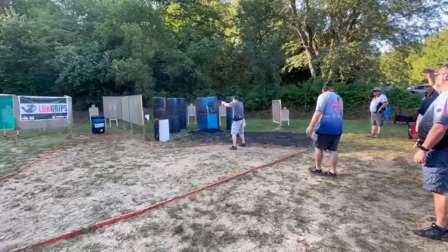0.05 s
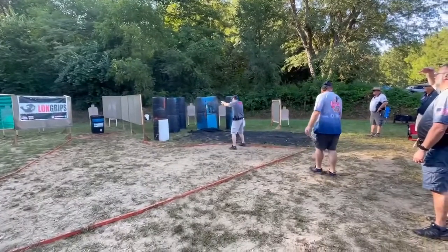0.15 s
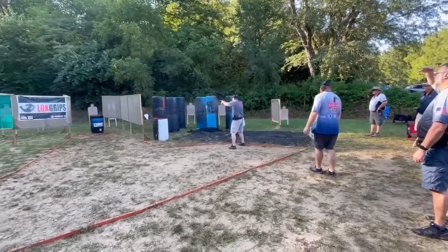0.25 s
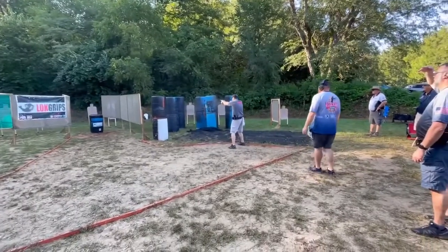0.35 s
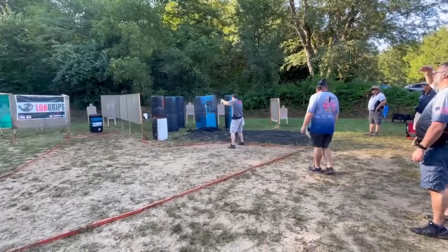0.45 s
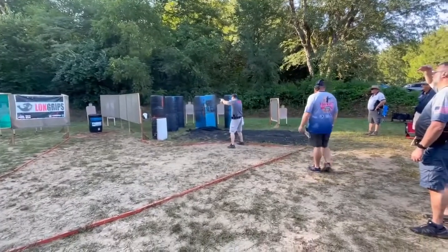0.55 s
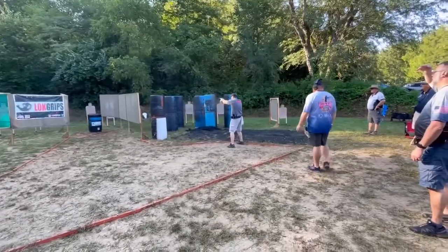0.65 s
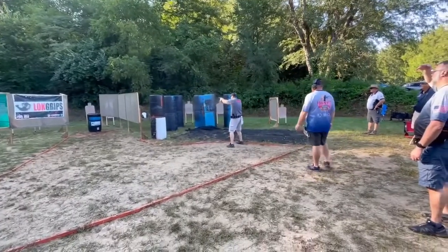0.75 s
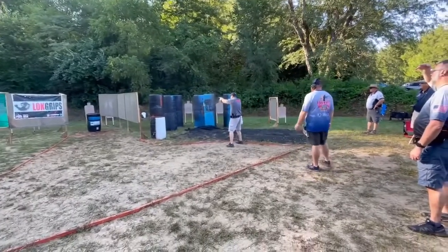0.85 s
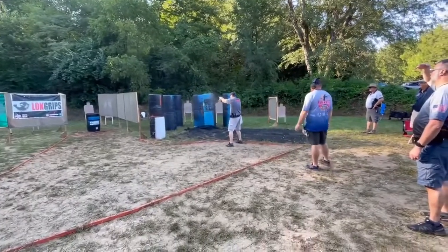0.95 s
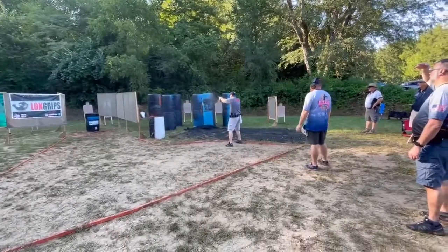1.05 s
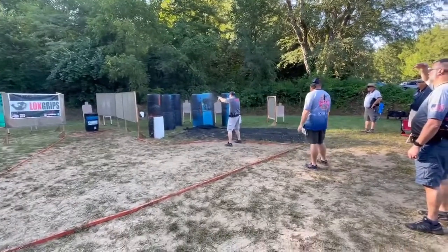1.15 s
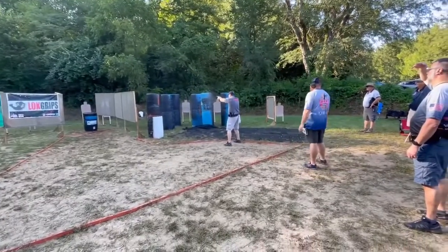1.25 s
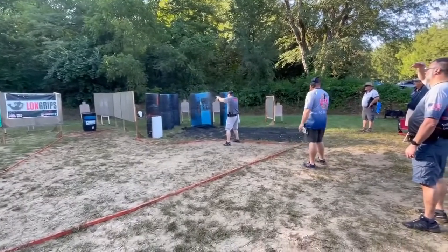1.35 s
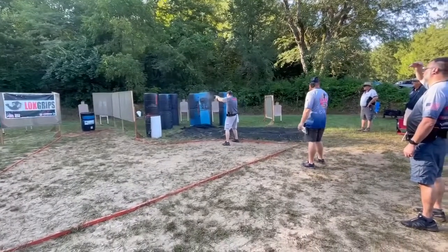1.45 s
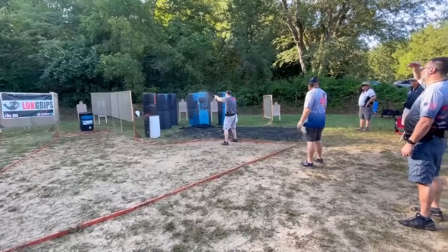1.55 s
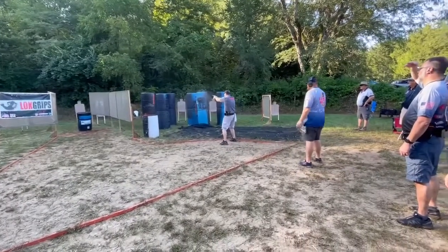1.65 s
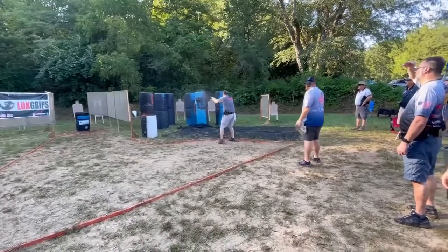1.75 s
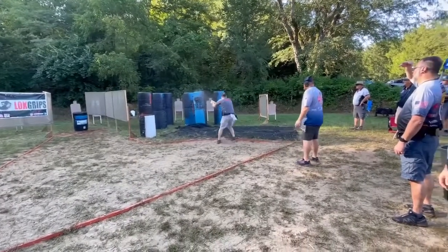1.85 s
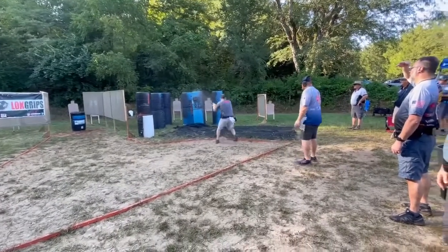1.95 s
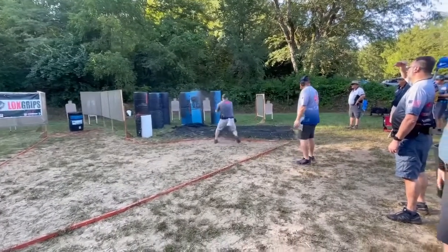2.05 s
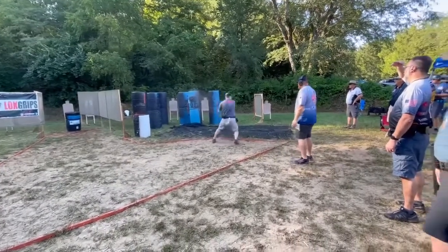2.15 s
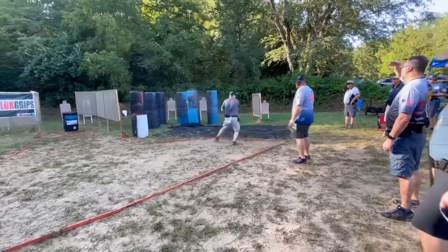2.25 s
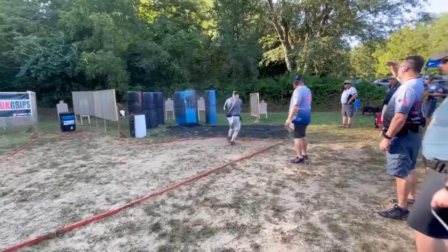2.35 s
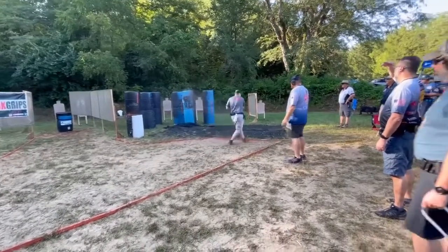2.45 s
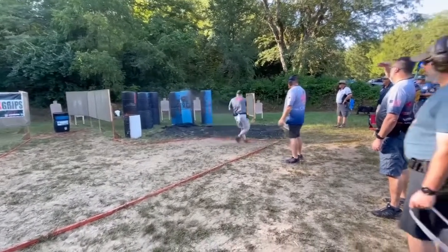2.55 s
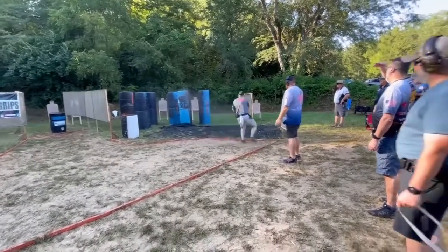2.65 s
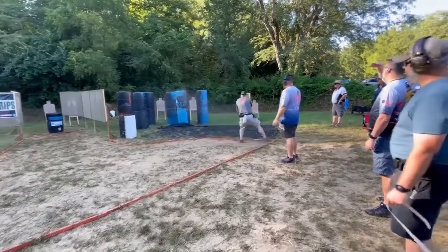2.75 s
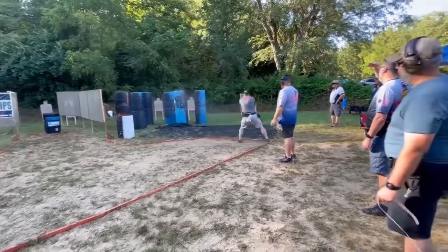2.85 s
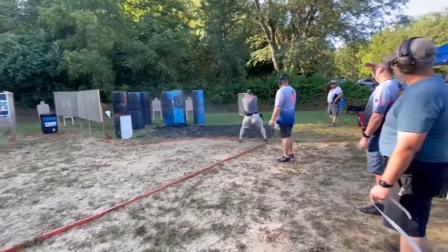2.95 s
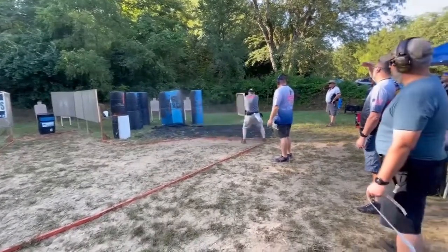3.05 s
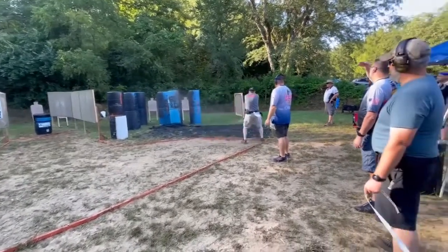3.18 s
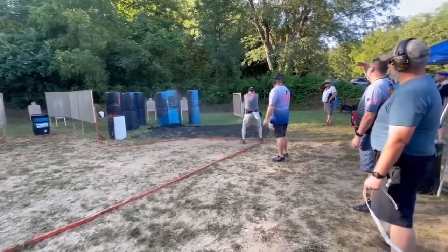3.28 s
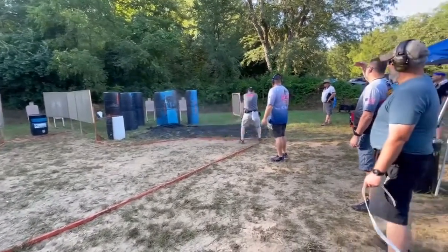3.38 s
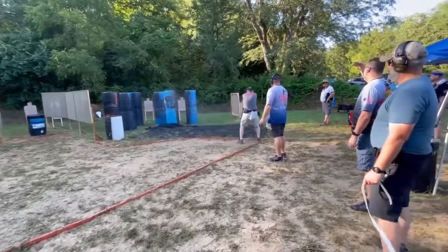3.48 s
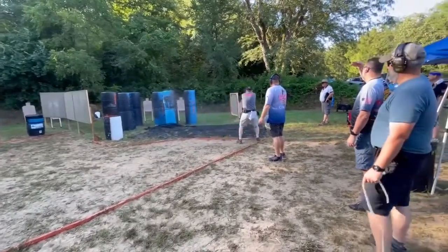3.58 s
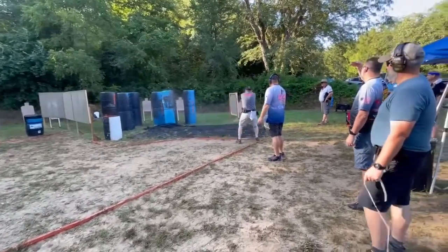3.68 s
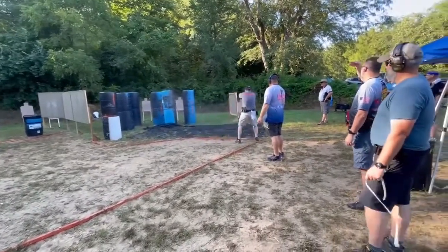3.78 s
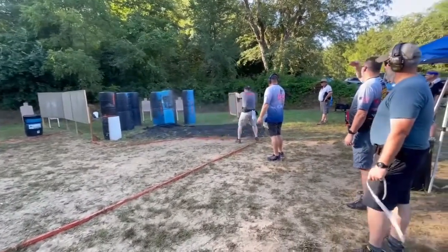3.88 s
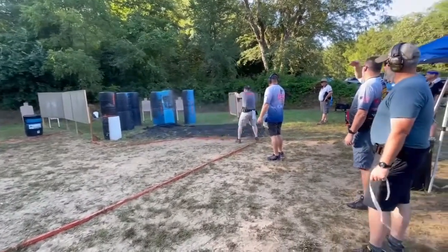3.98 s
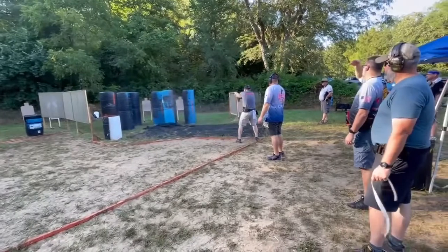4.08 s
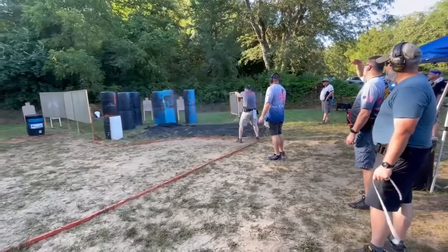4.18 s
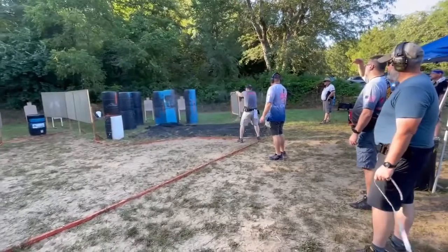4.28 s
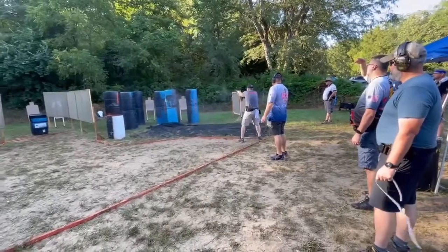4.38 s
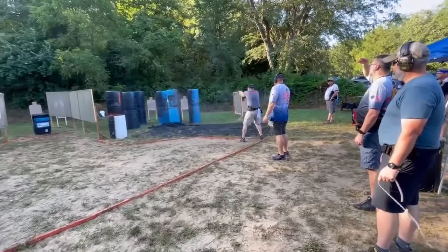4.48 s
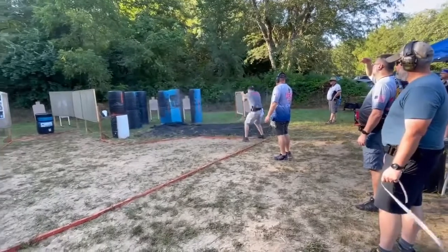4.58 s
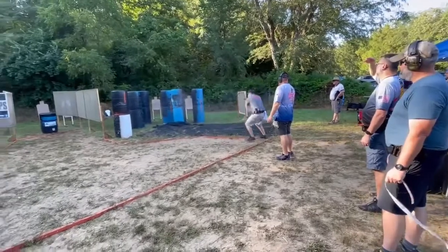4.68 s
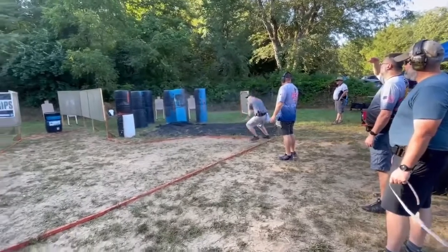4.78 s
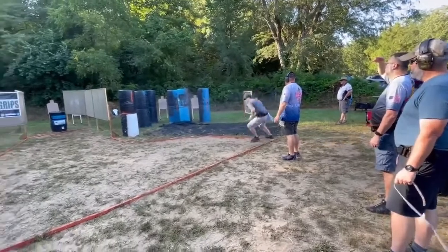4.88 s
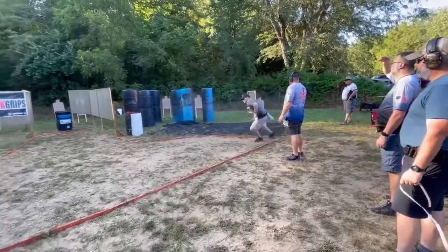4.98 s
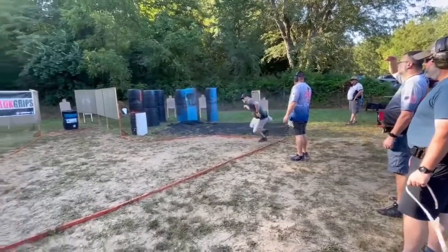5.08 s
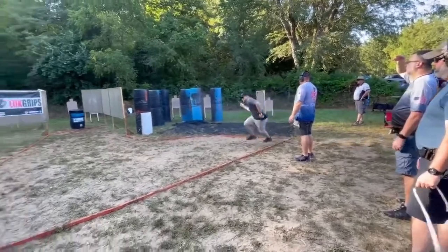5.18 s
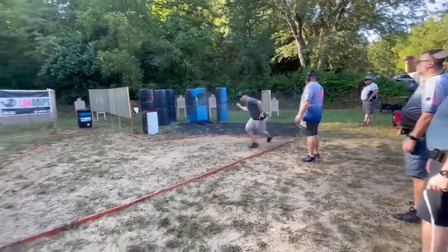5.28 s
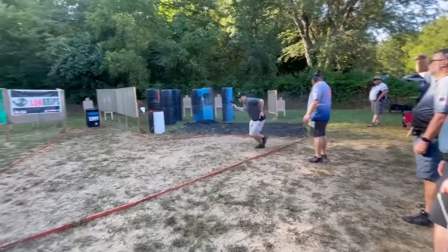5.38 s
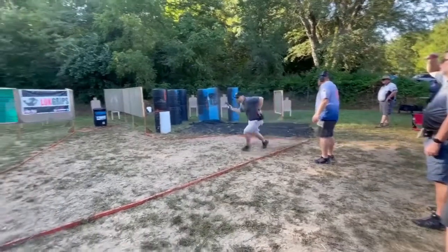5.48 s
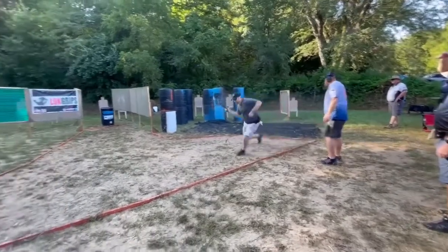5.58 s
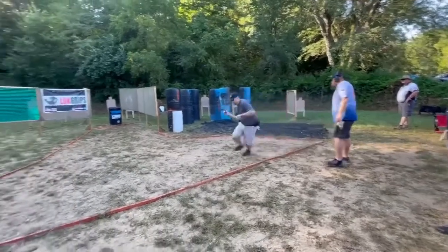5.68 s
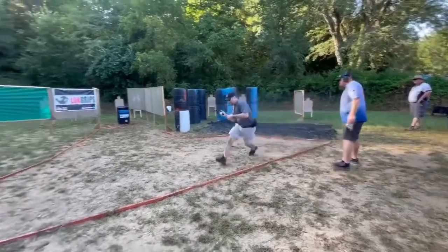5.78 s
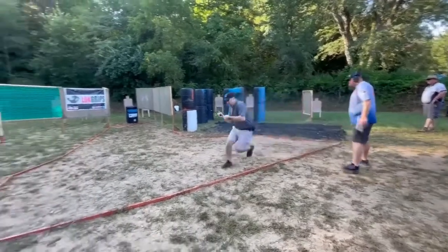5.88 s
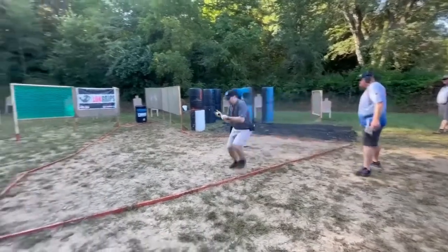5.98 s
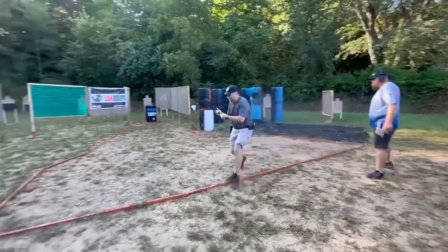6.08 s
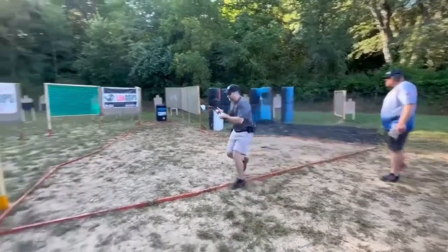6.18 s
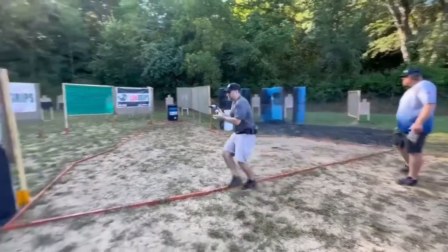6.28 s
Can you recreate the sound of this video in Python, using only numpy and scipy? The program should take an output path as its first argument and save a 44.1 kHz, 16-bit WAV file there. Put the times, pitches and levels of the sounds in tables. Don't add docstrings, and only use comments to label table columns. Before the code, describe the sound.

Sharp, slightly rounded pistol blasts in an open field ringed by trees, heard from a spectator's position. Three spaced shots come first, then after nearly two seconds two quick doubles. Bunched reflections and low barrel booms follow each, trailing into a diffuse leafy echo. Softer muffled shots from other bays fill the gaps and the shooter-free ending, over low air noise, a barely audible cricket and tiny belt clicks.

```python
import sys
import numpy as np
from scipy import signal
from scipy.fft import rfft, irfft, next_fast_len
from scipy.io import wavfile
from scipy.ndimage import uniform_filter1d

SR = 44100
rng = np.random.default_rng(int(sys.argv[2]) if len(sys.argv) > 2 else 0)


def gain_from_db(level_db):
    decades = np.asarray(level_db, float) / 20
    return 10 ** decades


def generate_wav(sig):
    pcm = np.round(np.clip(np.atleast_2d(sig).T, -1, 1) * 32767).astype(np.int16)
    wavfile.write(sys.argv[1], SR, pcm)


N = 279153
TOP_HZ = 11850


def read(points, hz):
    f, value = np.transpose(points)
    return np.interp(np.log(hz + 1), np.log(f + 1), value)


def evened(x):
    return x / np.sqrt(np.mean(x ** 2) + 1e-20)


def add(mix, s, sound):
    part = mix[:, max(round(s * SR), 0):][:, :sound.shape[1]]
    part += sound[:, :part.shape[1]]


def sides(db):
    return gain_from_db(np.array([[db / 2], [-db / 2]]))


# [f/Hz, side minus mid/dB]
WIDTH = [(60, -1.5), (98, -2.5), (160, -18.5), (260, -3.5), (420, -10.5), (680, 1), (1110, 1.5), (1800, 1),
         (2930, 0.5), (4760, 0), (7740, -0.5), (12600, 3)]


def pair(z, hz):
    side = gain_from_db(read(WIDTH, hz))
    return np.array([z[0] + side * z[1], z[0] - side * z[1]]) / np.sqrt(1 + side ** 2)


def coloured(spectrum, size, top_hz=TOP_HZ):
    hz = np.fft.rfftfreq(size, 1 / SR)
    z = rfft(rng.standard_normal((2, size))) * gain_from_db(read(spectrum, hz)) * (hz < top_hz)
    return evened(irfft(pair(z, hz), size))


# [f/Hz, level/dB per Hz]
RUMBLE = [(15, -24), (30, -4), (60, 1), (120, -7.5), (220, -10.5), (400, -46.5)]


def breeze(level_db=-83, lumps_db=6):
    lumps = uniform_filter1d(rng.standard_normal(N), size=3000)
    lumps = evened(uniform_filter1d(lumps, size=3000))
    return gain_from_db(level_db + lumps_db * lumps) * coloured(RUMBLE, size=next_fast_len(N))[:, :N]


def cricket(level_db=-85, whistle_hz=6560, pulses_per_s=19.95, beat_s=2.866, sag_hz=90, duty=0.15):
    beat = 2 * np.pi * pulses_per_s * (np.arange(N) / SR - beat_s)
    tone = np.sin(2 * np.pi * np.cumsum(whistle_hz - sag_hz * np.sin(beat)) / SR)
    return gain_from_db(level_db) * np.sqrt(2) * tone * np.clip(np.cos(beat) + duty, 0, 1) * np.ones((2, 1))


def pulse(chirps, size=900):
    t, ring = np.arange(size) / SR, 0
    for start_hz, end_hz, fall_s, swell_s, db in chirps:
        turns = end_hz * t + (start_hz - end_hz) * fall_s * (1 - np.exp(-t / fall_s))
        swell = (t / swell_s) ** 2 * np.exp(-t / swell_s)
        ring = ring + gain_from_db(db) * swell * np.sin(2 * np.pi * turns)
    return ring / abs(ring).max()


# [start f/Hz, end f/Hz, fall/s, swell/s, level/dB]
BLAST = [(1913, 500, .0011, .001, -2), (3000, 1050, .0008, 0.00034, -0.5)]
# [f/Hz, level/dB per Hz]
CRACK = [(900, -21.5), (1800, 0.5), (3000, 6), (5000, -2.5), (8000, -1.15), (10500, -1), (12500, -12),
         (13200, -43.5)]


def arrival(crack_db, top_hz, spread_s=.0022, lag_s=0.00023, crack_s=0.00095, shared=0.52):
    paths = np.zeros((2, 400))
    at = (rng.random((2, 3)) ** 1.7 * spread_s + lag_s) * SR
    np.put_along_axis(paths, at.astype(int), rng.choice([-1., 1.], (2, 3)) * 0.7, axis=1)
    paths[1] += shared * paths[0]
    blast = signal.fftconvolve(paths, pulse(BLAST)[None], axes=1)[:, :1200]
    u = np.arange(1200) / SR / crack_s
    return blast + gain_from_db(crack_db) * coloured(CRACK, size=1200, top_hz=top_hz) * u * np.exp(1 - u)


# [t/s, tree tail level/dB, thump level/dB, left-right/dB, boom level/dB]
FAR = [(-.12, -28.5, -41, 0, -70), (.07, -31.5, -45, 5, -54), (0.326, -32, -46, -15, -61),
       (0.402, -33.5, -48, 9, -28), (0.647, -30, -28, 2.5, -32), (2.314, -35.5, -34, -12, -47),
       (3.205, -35.5, -28, -5, -57), (3.8004, -31.5, -25, -4, -33.5), (4.9456, -36.5, -31.5, -10, -63.5),
       (5.0704, -33.5, -37, 13, -47), (5.61, -38.5, -26, 7, -45.5), (6.018, -38.5, -45, 6, -36),
       (6.164, -40.5, -49, 10, -57)]
BAY_OF = [2, 2, 2, 1, 1, 0, 0, 1, 0, 1, 3, 3, 1]
# [start f/Hz, end f/Hz, fall/s, swell/s, level/dB]
THUMP = [(1274, 86, 0.0031, 0.00063, -.1)]
OPEN_DB = [-38, -2.5, -32, -12]


def far_shots(lag_s=0.00038, crack_db=-9):
    out = np.zeros((2, N))
    for (s, _, db, pan_db, _), bay in zip(FAR, BAY_OF):
        thump = pulse(THUMP)
        late = np.roll(thump, round(lag_s * SR))
        ports = np.array([thump, late] if pan_db > 0 else [late, thump])
        add(out, s, gain_from_db(db) * sides(pan_db) * ports)
        add(out, s, gain_from_db(db + OPEN_DB[bay]) * sides(pan_db) * arrival(crack_db, TOP_HZ))
    return out


def power(spectrum, hz):
    share = gain_from_db(read(spectrum, hz)) ** 2
    return (share / share.sum())[:, None]


# [f/Hz, level/dB per Hz]
AIR = [(25, -25.5), (55, -3.5), (180, -17), (600, -3.5), (1800, -12), (2600, -30), (6000, -35),
       (9000, -36.5), (11000, -72)]
# [f/Hz, level/dB per Hz]
YARD = [(24, -24), (40, -3), (277, -18.5), (616, 4), (886, -15), (976, 4), (1970, -22.5), (2970, -15),
        (11200, -21), (12100, -28), (13000, -79.5)]
# [f/Hz, t60/s]
YARD_T60 = [(60, 0.19), (300, 0.3), (1000, 0.28), (3000, 0.49), (8000, 0.39), (12000, 0.6)]
YARD_DB = [-15, -13.5, -14.5]
# [f/Hz, level/dB per Hz]
TREES = [(24, -32), (40, -6), (60, -1), (240, -22.5), (353, -15.5), (399, 0.5), (976, -2.5), (1740, -8),
         (3520, -16.5), (4170, -18.5), (8620, -23.5), (11800, -41), (13000, -76.5)]
# [f/Hz, t60/s]
TREES_T60 = [(60, 0.21), (300, 1.364), (1000, 1.35), (3000, 1.212), (8000, 1.02), (12000, 0.67)]
# [bank scatter over tree tail/dB, tail rise/s, tail tilt/dB per octave, boom start f/Hz, boom hold/s]
BAYS = [
    (-12, 0.073, -0.1, 180, .026),
    (-0.8, .09, -0.45, 182, 0.012),
    (-4.5, .035, 0.83, 110, .013),
    (-0.9, 0.06, 1.5, 354, .017),
]
BANK_LAG_S = [.013, 0, 0, 0]
# [f/Hz, left-right/dB]
LEAN = [(60, 4), (130, 1), (280, -5.5), (590, 1), (1270, 1), (2730, -3), (5870, 8.5), (12600, -4.5)]


def wash(air_db=-66, trees_rise_s=0.13, patchy_db=2.0, flicker_db=0.5):
    frames, hz = N // 64 + 5, np.fft.rfftfreq(256, 1 / SR)
    t = np.arange(frames) * 64 / SR
    field = gain_from_db(air_db) ** 2 * power(AIR, hz) * np.ones(frames)

    def tail(s, db, rise_s, t60):
        age = np.maximum(t - s, 0)
        decay = np.exp(-2 * np.log(1000) * age / read(t60, hz)[:, None])
        return decay * (gain_from_db(db) * (1 - np.exp(-(age / rise_s) ** 2))) ** 2

    for (s, *_, trees_db), stance in zip(NEAR, STANCE_OF):
        field = field + power(YARD, hz) * tail(s, YARD_DB[stance], 0.003, YARD_T60)
        field = field + power(TREES, hz) * tail(s, trees_db, trees_rise_s, TREES_T60)
    for (s, db, *_), bay in zip(FAR, BAY_OF):
        bank_db, rise_s, bright_db, *_ = BAYS[bay]
        lag_s = BANK_LAG_S[bay]
        tilt = gain_from_db(bright_db * np.log2(hz / 700 + 0.04))[:, None] ** 2
        bank = tail(s + lag_s, db + bank_db, 0.0013 + lag_s / 2, YARD_T60)
        field = field + power(TREES, hz) * tilt * (bank + tail(s, db, rise_s, TREES_T60))

    a, b, c, d, patches = rng.standard_normal((frames, len(hz), 5)).T
    patches = evened(uniform_filter1d(uniform_filter1d(patches, size=30, axis=1), size=4, axis=0))
    flicker = evened(uniform_filter1d(rng.standard_normal(frames), size=6))
    left, right = pair([a + 1j * b, c + 1j * d], hz[:, None]) * (hz < TOP_HZ)[:, None]
    lean = gain_from_db(read(LEAN, hz)[:, None] / 2)
    uneven = gain_from_db(patchy_db * patches + flicker_db * flicker)
    z = np.array([left * lean, right / lean]) * np.sqrt(field) * uneven
    return signal.istft(z, nperseg=256, noverlap=192)[1][:, :N]


# [t/s, blast level/dB, left-right/dB, tree tail level/dB]
NEAR = [
    (0.1446, -5.5, 9.5, -30.5),
    (.866, -8.5, 0, -27),
    (1.4438, -8, 2, -26.5),
    (3.3445, -9, -4, -18.5),
    (3.4786, -9, -0.5, -34),
    (4.186, -7, 6, -31),
    (4.3538, -5.5, 10.5, -25.5),
]
STANCE_OF = [0, 0, 0, 1, 1, 2, 2]
# [delay/s, left level/dB, right level/dB, crack level/dB]
ARRIVALS = [
    [(0, 2, 6.5, -6), (.010, -10.5, -6, -6.5), (.018, -14.5, -2.5, -4), (.024, -9.5, -13, -1.5),
     (.0295, 3.35, 2, -10), (.2, -25, -42, -17)],
    [(0, 3, 6.5, -10), (.011, -13, -14, -10), (.022, -8.5, -4.5, -6), (.037, -10.5, -6, 1),
     (.108, -32, -18, -5.5)],
    [(0, 2.5, 12, -8.5), (.012, -5.5, -11, -24), (.022, -4, -34.5, -18), (.036, -1, -13, -20),
     (.11, -30, -22, -10.5), (.25, -27, -34, -12)],
]
# [f/Hz, level/dB per Hz]
CLUTTER = [(59, -58), (100, -7.5), (588, -6.5), (1410, -7.5), (1700, -7), (4600, -12.5), (6500, -17),
           (9010, -22), (10200, -35), (11500, -7), (13000, -70)]
CLUTTER_DB = [-16.5, -19, -17.5]
CLUTTER_S = [0.038, 0.049, 0.046]
CLUTTER_TILT = [0.28, 0.11, -2.5]


def near_shots(smear_db=-11, smear_s=.0035):
    out, t = np.zeros((2, N)), np.arange(4000) / SR
    for (s, db, pan_db, *_), stance in zip(NEAR, STANCE_OF):
        for late, left_db, right_db, crack_db in ARRIVALS[stance]:
            gains = gain_from_db(np.array([[left_db], [right_db]]) + db) * sides(pan_db)
            top_hz = SR if late < .005 and stance == 2 else TOP_HZ
            add(out, s + late, gains * arrival(crack_db, top_hz))
        span = (1 - np.exp(-t / 0.0016)) / (1 + np.exp((t - CLUTTER_S[stance]) / 0.003))
        tilted = [(hz, level + CLUTTER_TILT[stance] * np.log2(hz / 700)) for hz, level in CLUTTER]
        add(out, s, gain_from_db(CLUTTER_DB[stance]) * coloured(tilted, size=4000) * span)
        ahead = np.exp(-t[999::-1] / smear_s)
        smear = coloured(CLUTTER, size=1000, top_hz=9000) * ahead
        add(out, s - 1000 / SR, gain_from_db(db + smear_db) * smear)
    return out


def boom(start_hz, hz, hold_s, rumble_db, sag_s=.006, right_db=-10, rumble_t60=0.34):
    t = np.arange(SR // 2) / SR
    turns = hz * t + (start_hz - hz) * sag_s * (1 - np.exp(-t / sag_s))
    rise, fade_s = 1 - np.exp(-t / .002), .007
    throb = rise * np.exp(-np.maximum(t - hold_s, 0) / fade_s) * np.sin(2 * np.pi * turns)
    rumble = rise * gain_from_db(rumble_db - 60 * t / rumble_t60) * coloured(RUMBLE, size=len(t))
    return np.array([[1], [-gain_from_db(right_db)]]) * throb + np.array([[1], [gain_from_db(right_db / 2)]]) * rumble


# [t/s, level/dB, hold/s]
BOOMS = [
    (0.147, -16.5, 0.022),
    (0.87, -19.5, 0.019),
    (0.914, -28, 0.017),
    (1.445, -6.5, 0.022),
    (3.359, -38.5, .02),
    (3.478, -13.5, 0.0061),
    (4.189, -5.5, 0.028),
    (4.373, -8.5, 0.017),
]
BANK_DB = [-35, -58, -44.5]


def booms(barrel_start_hz=185, far_lag_s=0.0028, bank_s=.241, bank_start_hz=180, bank_hold_s=0.0078):
    out = np.zeros((2, N))
    rows = [(s, db, barrel_start_hz, hold_s, 0) for s, db, hold_s in BOOMS]
    for (s, *_, db), bay in zip(FAR, BAY_OF):
        rows.append((s + far_lag_s, db, *BAYS[bay][-2:], 0))
    for (s, *_), stance in zip(NEAR, STANCE_OF):
        rows.append((s + bank_s, BANK_DB[stance], bank_start_hz, bank_hold_s, -8.5))
    for s, db, start_hz, hold_s, extra_db in rows:
        hz = min(57.7 - 0.24 * db, 80)
        rumble_db = -26.5 + (.56 - 1) * db + extra_db
        add(out, s, gain_from_db(db) * boom(start_hz, hz, hold_s, rumble_db))
    return out


# [t/s, level/dB, f/Hz]
CLICKS = [
    (5.625, -41.5, 11300),
    (6.126, -40, 11300),
    (6.308, -36, 10800),
    (6.311, -38, 7000),
    (6.314, -37.5, 3500),
]


def gear():
    out = np.zeros((2, N))
    for s, db, hz in CLICKS:
        add(out, s, gain_from_db(db) * np.ones((2, 1)) * pulse([(hz, hz * 0.91, .0004, .00012, 0)]))
    return out


def scene():
    return breeze() + cricket() + far_shots() + wash() + near_shots() + booms() + gear()


def patch_treble(x, loud, edge_hz=12200, low_hz=2400, holes=.27, thin_db=5, jump_db=7):
    frame = dict(window=signal.windows.cosine(256), nperseg=256, noverlap=128)
    hz, t, z = signal.stft(x, SR, **frame)
    draw = rng.random((z.shape[2] // 3 + 1, 2, 19, 2)).transpose(3, 1, 2, 0)
    draw = draw.repeat(7, axis=2).repeat(3, axis=3)
    lost, uneven = draw[:, :, :len(hz), :z.shape[2]]
    level_db = 10 * np.log10((abs(z[:, 40:]) ** 2).sum((0, 1)) + 1e-20)
    jump = np.diff(level_db, prepend=0, n=1) > jump_db
    patchy = np.where((hz > low_hz)[:, None], (lost > holes) * gain_from_db(thin_db * (2 * uneven - 1)), 1)
    keep = np.where(jump, 1, patchy * (hz < edge_hz)[:, None])
    return signal.istft(z * np.where(loud(t), keep, 1), SR, **frame)[1][:, :x.shape[1]]


# [f/Hz, gap that empties mid/dB, gap that empties side/dB, weak-line cut under band/dB]
THINNING = [(700, 12, 14, -14), (1300, 2.8, 5, -4), (1900, 1.9, 5, -1.5), (2700, .4, 5, -1.5),
            (3700, 3.2, 1.8, -3), (8500, 3.4, 2.8, -3), (9400, 1.8, 3.5, -3), (10900, 1.8, 3.5, -3),
            (11300, 4, .3, -3)]


def thin(x, lead=554, edge_hz=13100, drift_db=.8, spent_db=2, loud_db=22, attack_db=9):
    frame = dict(window=signal.windows.cosine(2048), nperseg=2048, noverlap=1024)
    mid_side = np.pad([x[0] + x[1], x[0] - x[1]], ((0, 0), (lead, 0)))
    hz, t, z = signal.stft(mid_side, SR, **frame)
    band = np.round(13 * np.log(1 + hz / 1200)).astype(int)
    starts = np.flatnonzero(np.diff(band, prepend=-1))
    level = np.add.reduceat(abs(z) ** 2, starts, axis=1) / np.diff(starts, append=len(hz))[:, None]
    mid_db, side_db = 10 * np.log10(uniform_filter1d(level, size=3) + 1e-20)[:, band]
    f, *limits = np.transpose(THINNING)
    mid_gap_db, side_gap_db, weak_db = (np.interp(hz, f, limit)[:, None] for limit in limits)

    spare_db = drift_db * evened(uniform_filter1d(rng.standard_normal(z.shape[2]), size=2))
    frame_db = 10 * np.log10(level[:, -12:].sum((0, 1)) + 1e-20)
    attack = np.diff(frame_db, prepend=np.inf) > attack_db
    blast = attack & (frame_db > frame_db.max() - loud_db)
    spare_db = spare_db - spent_db * np.roll(blast, 1)
    keep = [side_db - mid_db < mid_gap_db + spare_db, mid_db - side_db < side_gap_db + spare_db]
    keep = keep * (abs(z) > gain_from_db(weak_db) * np.sqrt(level[:, band])) * (hz < TOP_HZ)[:, None]
    keep = np.where(attack, (hz < edge_hz)[:, None], keep)
    thinned = signal.istft(z * keep, SR, **frame)[1]
    mid, side = patch_treble(thinned, lambda s: np.interp(s, t, blast) > .4)[:, lead:lead + N]
    return np.array([mid + side, mid - side]) / 2


def band_limit(x):
    return signal.sosfilt(signal.butter(12, 13190, fs=SR, output="sos"), x)


def record(dry):
    ceiling = .97
    limited = ceiling * np.tanh(dry / ceiling)
    mix = thin(limited)
    return band_limit(mix)


dry = scene()
out = record(dry)
generate_wav(out)
```